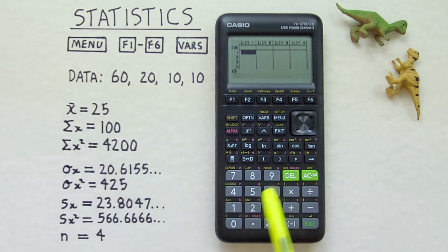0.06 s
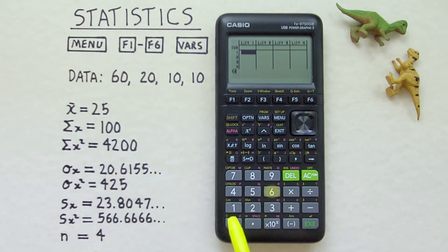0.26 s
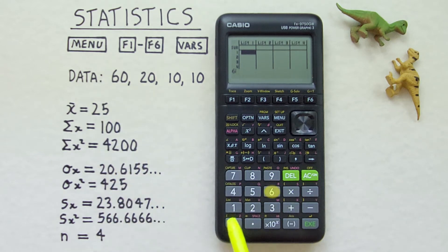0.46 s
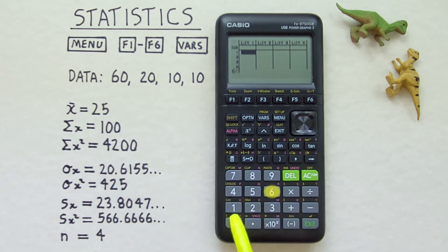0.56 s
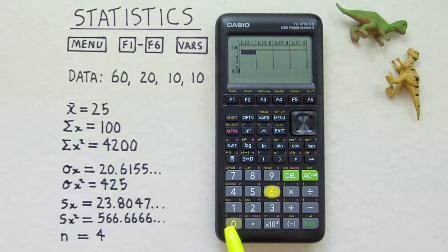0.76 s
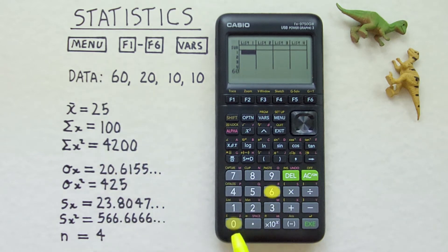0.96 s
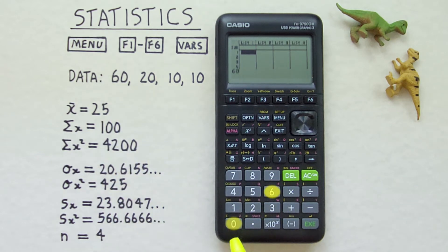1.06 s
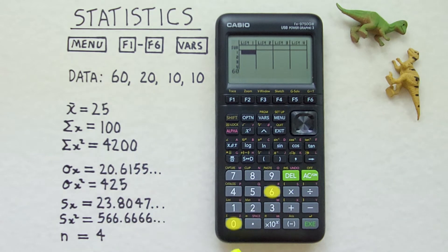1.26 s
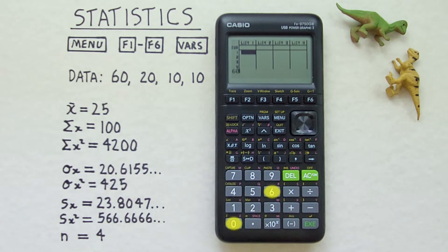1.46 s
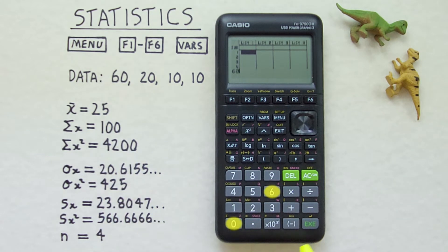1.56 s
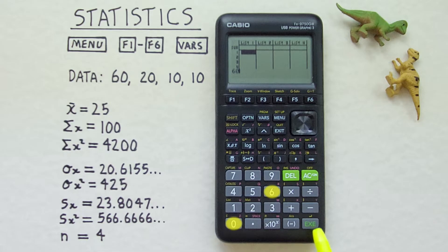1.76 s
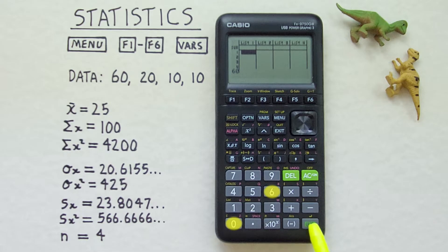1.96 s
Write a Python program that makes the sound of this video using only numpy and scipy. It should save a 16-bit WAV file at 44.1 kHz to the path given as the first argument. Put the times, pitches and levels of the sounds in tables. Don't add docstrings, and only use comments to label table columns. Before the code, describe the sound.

Close mono pickup of a plastic calculator on a wooden desk: a soft key press early, a second clackier one around the half second, deep thuds, then only faint bumps and rubbing in a quiet room.

```python
import sys
import numpy as np
from scipy import signal
from scipy.fft import rfft, irfft, next_fast_len
from scipy.io import wavfile
from scipy.ndimage import map_coordinates

SR = 44100
rng = np.random.default_rng(int(sys.argv[2]) if len(sys.argv) > 2 else 0)


def output_pcm(signal):
    pcm = np.clip(np.atleast_2d(signal).T, -1, 1) * 32767
    wavfile.write(sys.argv[1], SR, np.round(pcm).astype(np.int16))


def decibels_to_gain(level_db):
    exponent = np.asarray(level_db, float) / 20
    return 10 ** exponent


N = 88244

# time_s, speed_turns_per_s
SHAFT_SPEED = [(0, 38.9), (.6, 38.9), (.91, 38.65), (1.61, 39.1), (2.0, 39.65)]
# shaft_order, level_db (rms)
FAN_ORDERS = [(2, -77), (3, -81.5), (4, -85.5), (5, -67.5), (6, -89.5), (7, -80), (8, -87.5), (11, -93.5)]
# frequency_hz, density_db
RUMBLE_SPECTRUM = [(8, -15), (20, 3.5), (40, -9.5), (64, -17), (95, -30), (125, -20), (165, -27.5),
                   (250, -25.5)]
AIR_SPECTRUM = [(160, -4), (260, 5), (350, -6), (440, -3.5), (560, -7), (1200, -11), (2000, -19),
                (3500, -28.5)]
HISS_SPECTRUM = [(1000, 2), (3000, 2), (8000, -4.5), (15600, -5.5)]
# start_s, level_db, direction_sign, upper_modes_db
PUSHES = [(-.0175, -41, -1, -13), (.0711, -41.6, -1, -25), (.1257, -26.6, -1, -27), (.4799, -41, -1, -20),
          (.6103, -36.4, 1, -40), (.6394, -28.2, 1, -24), (.7169, -26.8, -1, -28)]
# start_s, level_db, direction_factor, upper_modes_db
NUDGES = [(0.971, -49.5, 0.95, -37.5), (1.059, -54.5, 1, -29), (1.191, -56, 0.98, -28),
          (1.54, -57, 0.9, -36), (1.701, -61.5, 1, -35)]
# pitch_hz, share_factor, t60_s
LOW_MODES = [(50.17, .1, 1), (53.49, -.171, 1), (55.92, 1, .4), (63.46, -1.13, .3)]
# pitch_hz, level_db, t60_s
UPPER_MODES = [(131.5, 3, 0.23), (197.3, -6, .12), (242, -15.5, 0.21), (358, -18, .07), (452, -19, .07)]
# start_s, level_db
KNOCK = (.615, -42.5)
KNOCK_SHARES = [-8, 8, 5, 4.5, -23]
# peak_s, case_level_db, case_pitch_hz, shell_level_db, crack_level_db
ROLLS = [(.1195, -60, 1020, -80, -72), (.1240, -43.5, 1114, -62, -69), (.1305, -56.5, 1130, -78, -71.5),
         (.1355, -52.5, 1140, -79, -76), (.5855, -58.5, 1394, -75, -80), (.597, -68, 1600, -66, -86),
         (.627, -63, 890, -59, -66), (.637, -63.5, 1240, -80, -91), (.645, -60.5, 1035, -79, -75),
         (.7145, -70, 1490, -65.5, -75), (.7185, -60, 1220, -70, -66.5), (.730, -59, 1230, -77, -75)]
# peak_s, case_level_db, case_pitch_hz, shell_level_db, crack_level_db
STRIKES = [(.4776, -54, 1130, -58, -69.5), (.6158, -58, 1260, -58.5, -60.5)]
# pitch_hz, level_db, t60_s
SHELL_MODES = [(1950, -9, .013), (2480, -3, .016), (2780, -3, .016), (7900, -16, .012)]
# frequency_hz, density_db
CRACK_SPECTRUM = [(900, -12), (1800, -3), (3300, -6), (5000, -3), (8000, 0), (10500, -2), (12500, -8),
                  (15500, -16)]
# start_s, rise_s, t60_s, level_db
SCUFFS = [(0.128, 0.0021, 0.21, -68.5), (.48, 0.002, 0.29, -75), (.582, 0.0081, 0.4, -71),
          (0.617, 0.0043, 0.23, -69), (.72, 0.0037, 0.37, -71), (1.35, 0.14, 1.4, -76.5)]
# frequency_hz, density_db
SCUFF_SPECTRUM = [(500, -14.5), (1200, 12), (1700, 0), (2500, -1.5), (3500, -13), (5000, -18), (8000, -39)]
# start_s, t60_s, level_db
DRUMS = [(0.476, 0.26, -64), (0.612, 0.29, -57), (.7, 1, -69), (.86, 0.18, -68.5), (1.02, 0.24, -72.5),
         (1.419, 0.54, -71), (1.569, 0.36, -69.5)]
# frequency_hz, density_db
DRUM_SPECTRUM = [(200, -8), (300, -7), (380, -1), (450, 5.5), (560, -11), (750, -17.5)]
# start_s, t60_s, level_db
RATTLES = [(.618, 0.19, -74), (0.52, 0.17, -83), (0.56, 0.12, -80.5), (.58, 0.18, -86.5)]
# start_s, level_db, pitch_hz
SNAP = (1.633, -71, 11000)
# frequency_hz, t60_s
ROOM_DECAY = [(200, 0.33), (1200, 0.42), (4000, 0.41), (12000, 0.13)]


def unit(x):
    return x / np.sqrt(np.mean(x ** 2) + 1e-20)


def along(points, hz):
    f, v = np.transpose(points)
    return np.interp(np.log(hz + 1), np.log(f + 1), v)


def wobble(rate_hz):
    knots = rng.standard_normal(int(N * rate_hz / SR) + 4)
    return map_coordinates(knots, [np.arange(N) * rate_hz / SR])


def noise(spectrum, size=N):
    m = next_fast_len(size + 8192)
    hz = np.fft.rfftfreq(m, 1 / SR)
    (low_hz, _), (high_hz, high_db) = spectrum[0], spectrum[-1]
    closed = [(low_hz / 3, -90)] + list(spectrum) + [(high_hz * 3, high_db - 24)]
    white = rfft(rng.standard_normal(m))
    return unit(irfft(white * decibels_to_gain(along(closed, hz)), m)[:size])


def since(start_s):
    return np.clip(np.arange(N) / SR - start_s, 0, None)


def onset(u, rise_s):
    return 1 - np.exp(-u / rise_s)


def ring(u, hz, t60_s, rise_s):
    return np.sin(2 * np.pi * hz * u) * decibels_to_gain(-60 * u / t60_s) * onset(u, rise_s)


def tone(cycles, level_db):
    phase = 2 * np.pi * (cycles + rng.random())
    return np.sqrt(2) * decibels_to_gain(level_db + wobble(9.14)) * np.sin(phase)


def fan():
    t = np.arange(N) / SR
    speed = np.interp(t, *np.transpose(SHAFT_SPEED))
    turns = np.cumsum(speed) / SR
    gain_db = 4.5 * (speed - speed.mean())
    hum = sum(tone(round(order) * turns, db + gain_db) for order, db in FAN_ORDERS)
    return hum + tone(590 * t, -87.5)


def room_noise():
    rumble = decibels_to_gain(-63 + 1.8 * wobble(4)) * noise(RUMBLE_SPECTRUM)
    air = decibels_to_gain(-77.5 + 0.52 * wobble(5.58)) * noise(AIR_SPECTRUM)
    hiss = decibels_to_gain(-88.5) * noise(HISS_SPECTRUM)
    return rumble + air + hiss


def earlier_press():
    u = since(0)
    tail = decibels_to_gain(-71 - 60 * u / .4) * noise([(500, -6), (1150, 0), (1800, -12), (4000, -22)])
    settling = decibels_to_gain(-46 - 60 * u / .1) * np.cos(2 * np.pi * 30 * u)
    return tail + settling


def desk():
    out = np.zeros(N)
    for start_s, db, direction, upper_db in PUSHES + NUDGES:
        u = since(start_s)
        low = sum(share * ring(u, hz, t60_s, .0065) for hz, share, t60_s in LOW_MODES)
        upper = sum(decibels_to_gain(level) * ring(u, hz, t60_s, .0032) for hz, level, t60_s in UPPER_MODES)
        out += direction * decibels_to_gain(db) * (low + decibels_to_gain(upper_db) * upper)
    start_s, db = KNOCK
    u = since(start_s)
    for (hz, level, t60_s), share_db in zip(UPPER_MODES, KNOCK_SHARES):
        out -= decibels_to_gain(db + level + share_db) * ring(u, hz, t60_s, .0024)
    return out


def key_tick(u, rise_s, case_db, case_hz, shell_db, crack_db):
    def swell(t60_s):
        return 1 / (np.exp(-u / rise_s) + decibels_to_gain(60 * u / t60_s))

    def mode(hz, t60_s):
        return swell(t60_s) * np.sin(2 * np.pi * hz * u)

    ring_t60_s, crack_t60_s = .015, .018
    case = mode(case_hz, ring_t60_s)
    case += .25 * mode(.7 * case_hz, ring_t60_s)
    case += .2 * mode(1.25 * case_hz, ring_t60_s)
    tick = decibels_to_gain(case_db) * case
    for hz, level, t60_s in SHELL_MODES:
        detune = 1 + rng.normal() / 40
        tick += decibels_to_gain(shell_db + level) * mode(hz * detune, t60_s)
    return tick + decibels_to_gain(crack_db) * swell(crack_t60_s) * noise(CRACK_SPECTRUM, size=len(u))


def keys():
    out, lead = np.zeros(N), SR // 50
    u = (np.arange(SR // 10) - lead) / SR
    for rows, rise_s in ((ROLLS, .0014), (STRIKES, .0004)):
        for peak_s, *levels in rows:
            out[round(peak_s * SR) - lead:][:len(u)] += key_tick(u, rise_s, *levels)
    return out


def scuffs():
    out = np.zeros(N)
    for start_s, rise_s, t60_s, db in SCUFFS:
        u = since(start_s)
        grains = decibels_to_gain(db - 60 * u / t60_s + 1.2 * wobble(250))
        out += grains * onset(u, rise_s) * noise(SCUFF_SPECTRUM)
    return out


def drumming():
    out = np.zeros(N)
    for start_s, t60_s, db in DRUMS:
        u = since(start_s)
        out += decibels_to_gain(db - 60 * u / t60_s) * onset(u, .006) * noise(DRUM_SPECTRUM)
    return out


def rattles():
    out = np.zeros(N)
    for start_s, t60_s, db in RATTLES:
        u = since(start_s)
        grains = decibels_to_gain(db - 60 * u / t60_s + 4 * wobble(500))
        out += grains * onset(u, .002) * noise(CRACK_SPECTRUM)
    return out


def far_snap():
    start_s, db, hz = SNAP
    u = since(start_s)
    colour = noise([(hz * .7, -4), (hz, -2), (hz * 1.25, 0)])
    return decibels_to_gain(db - 60 * u / .012) * (u > 0) * colour


def room_answer(near):
    hz, t, z = signal.stft(rng.standard_normal(SR // 2), SR, nperseg=256)
    decay = decibels_to_gain(-60 * t / along(ROOM_DECAY, hz)[:, None])
    tail = signal.istft(z * decay, SR, nperseg=256)[1]
    tail = tail / np.linalg.norm(tail)
    delayed = np.pad(near, (200, 0))
    return decibels_to_gain(-14) * signal.fftconvolve(delayed, tail)[:N]


def scene():
    background = fan() + room_noise() + earlier_press()
    near = keys() + scuffs() + drumming() + rattles() + far_snap()
    return (background + desk() + near + room_answer(near))[None]


def top_cut(x):
    return signal.sosfilt(signal.butter(12, 15700, fs=SR, output="sos"), x)


def record(dry):
    return top_cut(dry)


dry = scene()
out = record(dry)
output_pcm(out)
```